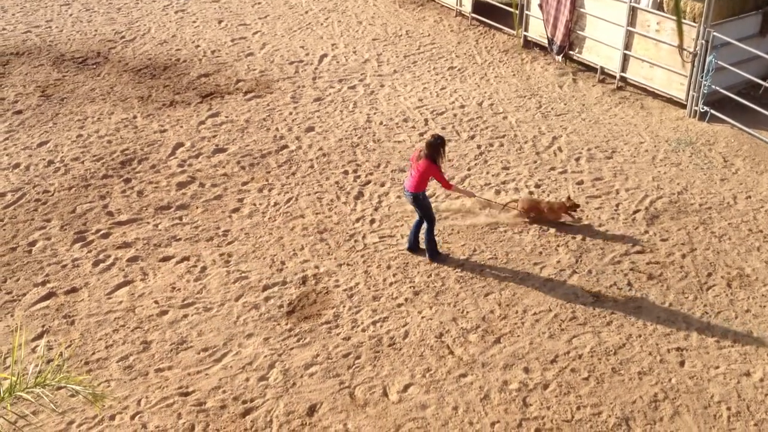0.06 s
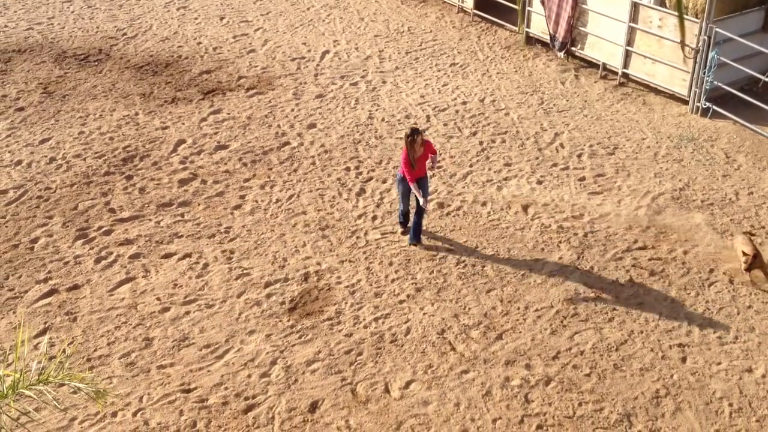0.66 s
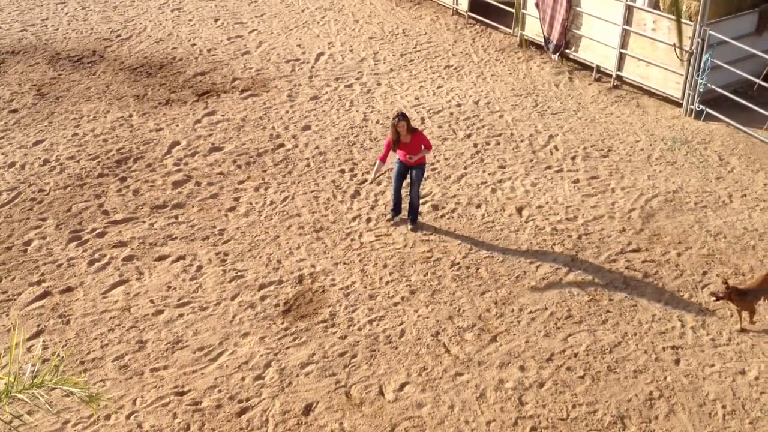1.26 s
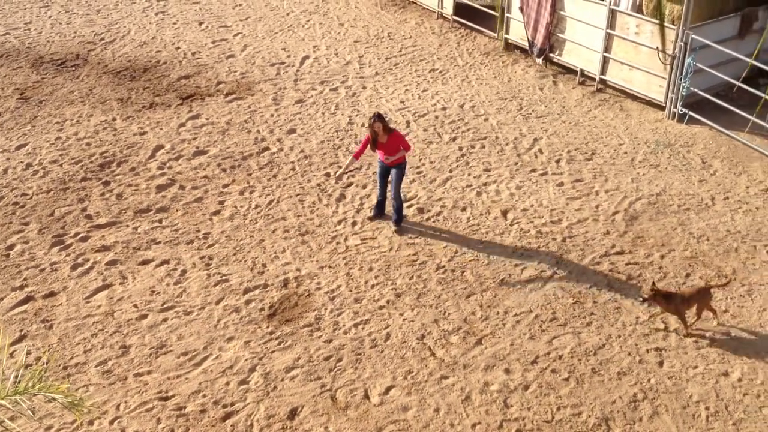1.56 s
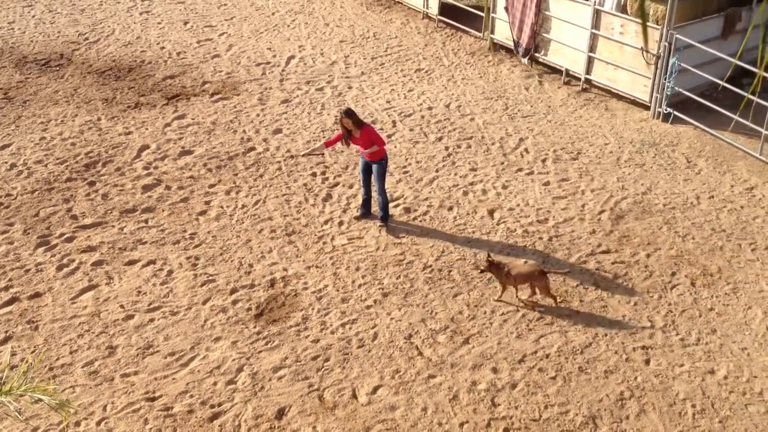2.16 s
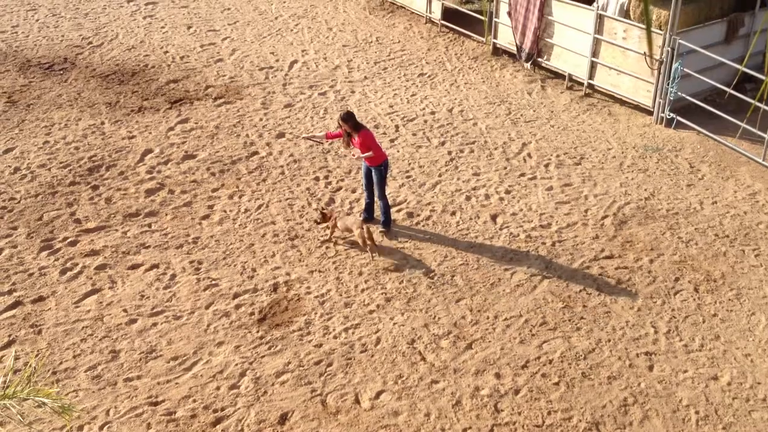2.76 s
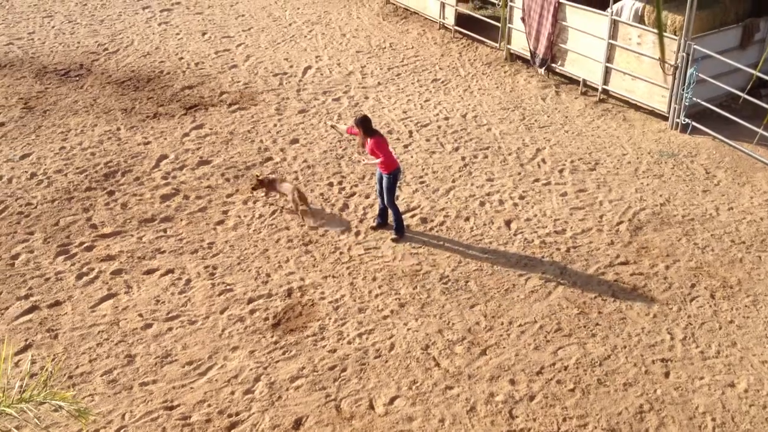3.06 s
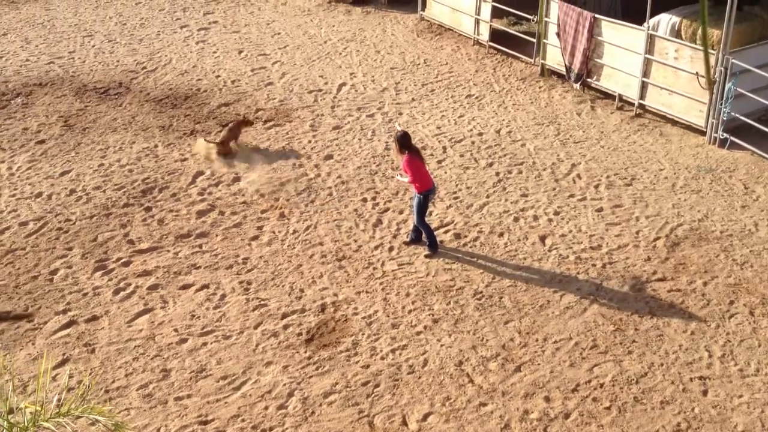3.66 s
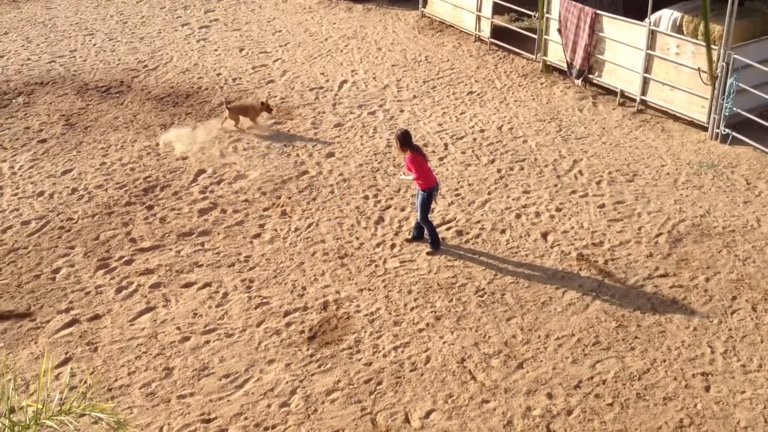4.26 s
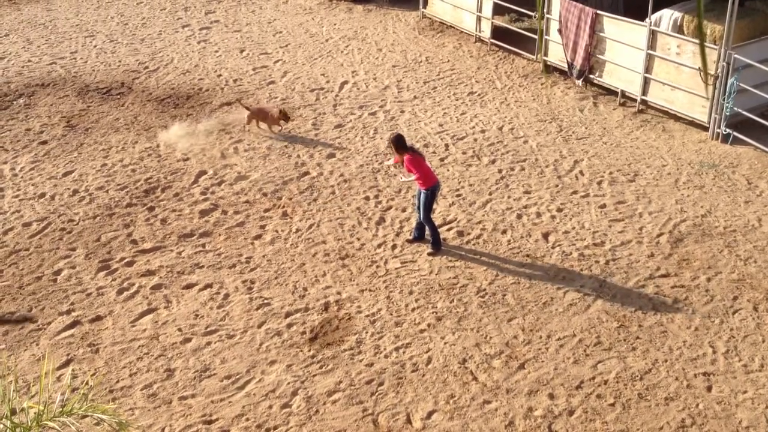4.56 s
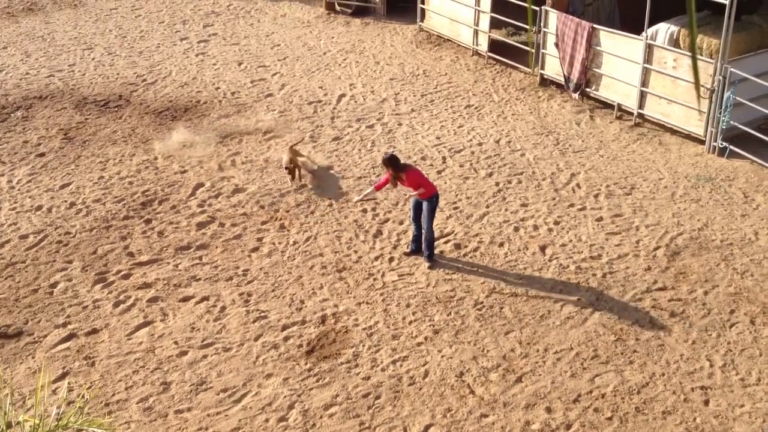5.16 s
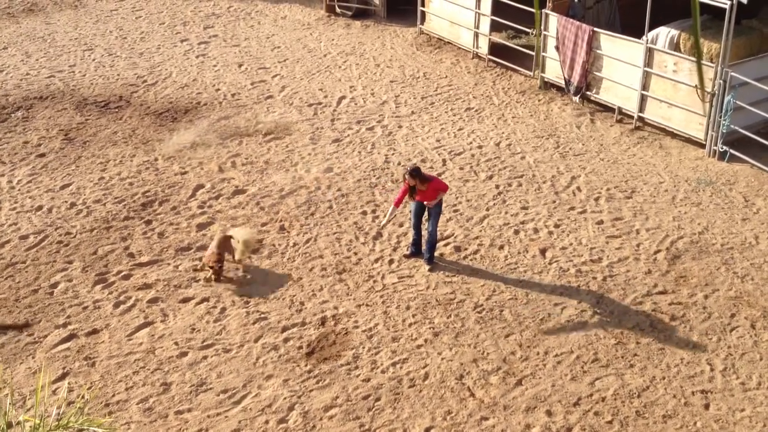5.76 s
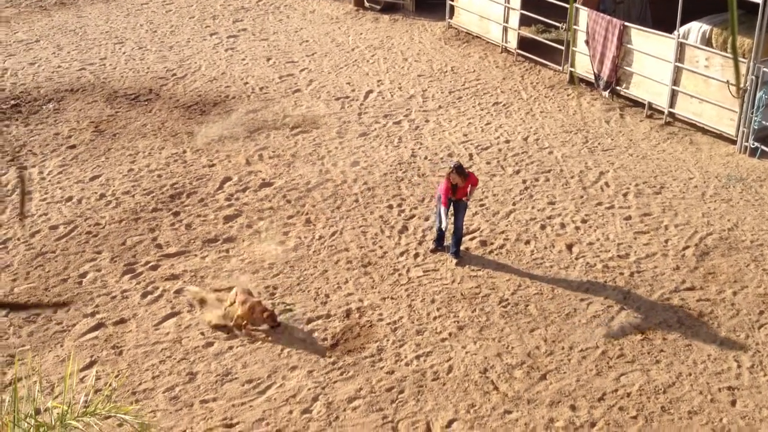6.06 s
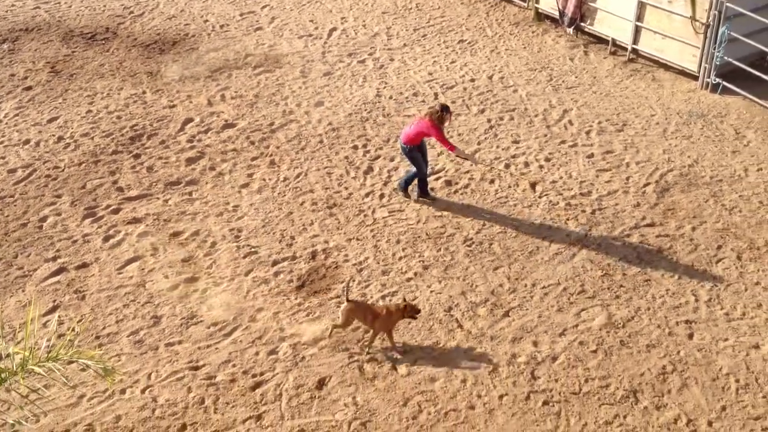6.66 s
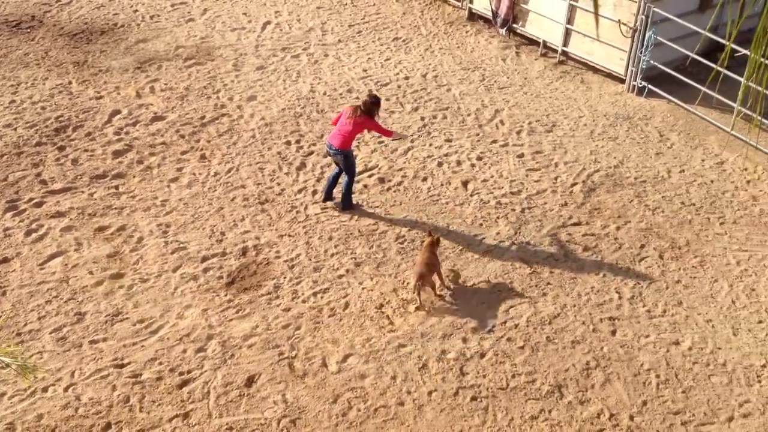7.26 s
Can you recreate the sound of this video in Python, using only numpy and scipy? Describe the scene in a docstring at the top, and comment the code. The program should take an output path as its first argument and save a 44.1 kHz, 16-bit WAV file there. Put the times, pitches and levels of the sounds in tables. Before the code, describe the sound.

Fingers shift on a hand-held camera outdoors, making dry pops, soft thuds and short rubs right at the microphone. Two very faint, distant whip swishes come first, then a sharp pop, a soft whoosh and faint hums. The loudest pop falls past the middle, after which the rubbing and bumping grow busier. A sleeve slides and plastic ticks sharply at the end. Low rumble and hiss continue underneath.

```python
"""Handling noise on a hand-held camera, high above a sandy arena where a dog chases a lure on a whip.
Fingers slip, push and drag on the case: it pops, thuds and rubs right at the microphone.
Near the end a sleeve slides along it and the plastic ticks sharply. Behind lie outdoor rumble and hiss,
two far swishes from eddies shed by the whip, one soft whoosh and faint hums."""
import sys
import numpy as np
from scipy import signal
from scipy.fft import rfft, irfft, next_fast_len
from scipy.io import wavfile
from scipy.ndimage import uniform_filter1d

SR = 44100
rng = np.random.default_rng(int(sys.argv[2]) if len(sys.argv) > 2 else 0)


def to_wav(s):
    """Save 16-bit WAV."""
    ch = np.atleast_2d(s).T  # columns
    pcm = np.round(np.clip(ch, -1, 1) * 32767)  # PCM
    wavfile.write(sys.argv[1], SR, pcm.astype(np.int16))


N = 332073
N_FFT = next_fast_len(N)
T = np.arange(N) / SR


def amp(db):
    return 10 ** (np.asarray(db) / 20)


def unit_rms(x):
    return x / np.sqrt(np.mean(x ** 2) + 1e-20)


def bins_hz(size):
    return np.fft.rfftfreq(size, 1 / SR)


def db_at(spectrum, hz):
    """Spectrum level, interpolated over log frequency."""
    knots_hz, db = np.transpose(spectrum)
    return np.interp(np.log(hz + 1), np.log(knots_hz + 1), db)


def coloured(x, spectrum):
    return irfft(rfft(x) * amp(db_at(spectrum, bins_hz(len(x)))), len(x))


def noise(spectrum):
    return unit_rms(coloured(rng.standard_normal(N_FFT), spectrum)[:N])


def band_noise(hz, half_width_hz):
    gain = 1 / (1 + ((bins_hz(N_FFT) - hz) / half_width_hz) ** 4)
    return unit_rms(irfft(rfft(rng.standard_normal(N_FFT)) * gain, N_FFT)[:N])


def split(x, hz):
    """Parts of x below and above hz."""
    low = irfft(rfft(x, N_FFT) / (1 + (bins_hz(N_FFT) / hz) ** 4), N_FFT)[:N]
    return low, x - low


def pulse(db):
    """Minimum-phase pulse of peak 1 from a level per bin."""
    log_gain = np.log(amp(np.concatenate([db, db[-2:0:-1]])))
    response = np.exp(np.conj(signal.hilbert(log_gain)))
    wave = np.fft.ifft(response).real[:len(response) // 2]
    return wave / abs(wave).max()


def add(mix, time_s, sound):
    part = mix[round(time_s * SR):][:len(sound)]
    part += sound[:len(part)]


def gaussian(centre_s, half_s):
    return np.exp(-np.minimum(((T - centre_s) / half_s) ** 2, 60))


def onset(start_s, rise_s):
    """Time since the start and a 0-to-1 ramp."""
    age_s = np.maximum(T - start_s, 0)
    return age_s, np.minimum(age_s / rise_s, 1)


def stroke(peak_s, length_s, rise_share=0.36):
    """Finger pressure: builds until peak_s, releases more slowly."""
    distance = np.maximum((peak_s - T) / rise_share, (T - peak_s) / (1 - rise_share)) / length_s
    pressure, near = np.zeros(N), distance < 10
    pressure[near] = np.exp(-distance[near] ** 1.4)  # 1 = pointed, 2 = rounded
    return pressure


def background(hiss_db=-72.5):
    """Far outdoor rumble under an even hiss."""
    # rumble level (time [s], level [dB])
    rumble_levels = [(0, -55.5), (.7, -59), (1.3, -56), (3.2, -54), (4.7, -58.5), (6.4, -56), (7.53, -53)]
    # rumble and hiss spectra (frequency [Hz], level [dB])
    rumble_spectrum = [(20, -32.5), (45, -33.5), (80, -17.5), (120, -4), (210, -1), (330, -6), (550, -15.5),
                       (850, -20), (1400, -32), (3000, -46), (16000, -72.5)]
    hiss_spectrum = [(20, -2), (2000, -1), (5000, -3), (8000, -5.5), (12000, -7), (16000, -5)]
    rumble_db = np.interp(T, *np.transpose(rumble_levels))
    return amp(rumble_db) * noise(rumble_spectrum) + amp(hiss_db) * noise(hiss_spectrum)


def rubs(slips_per_s=1500, spread_db=1.5, split_hz=520):
    """Dense, tiny, uneven skin slips shake the case; a faster drag is brighter."""
    # finger strokes (firmest moment [s], length [s], level [dB], brightness [dB])
    strokes = [(.090, 0.026, -47.5, 5), (.182, 0.021, -41, 2.5), (1.312, 0.084, -42, -3.5),
               (1.447, 0.027, -40, -2.5), (1.498, 0.033, -32.5, -0.5), (1.936, .02, -48, -14),
               (2.53, 0.026, -47, -12), (2.578, 0.029, -44.5, -23), (2.889, 0.038, -41.5, -3),
               (2.986, 0.032, -40, -0.5), (3.101, 0.021, -32, -0.5), (3.259, 0.024, -38.5, -7.5),
               (3.361, 0.023, -34.5, 1), (3.429, 0.021, -39, 7), (4.926, 0.018, -26.5, 5.5),
               (4.975, 0.029, -37.5, 4), (5.057, .028, -49.5, 0), (5.738, .03, -47, 2),
               (5.819, 0.035, -35.5, -.5), (5.952, 0.067, -39.5, 5.5), (6.002, 0.026, -26.5, -1),
               (6.068, .028, -46.5, -2.5), (6.258, 0.026, -26, 0.5), (6.352, 0.028, -46, 2.5),
               (6.549, 0.034, -43, -2.5), (6.634, 0.035, -30, 1), (6.726, 0.04, -36, 2.5),
               (6.791, 0.019, -42, -8), (6.854, .032, -26.5, 1), (6.912, 0.037, -26, -1),
               (6.944, 0.015, -29, 0), (7.013, 0.045, -25.5, 1), (7.059, 0.04, -35, -4),
               (7.138, 0.03, -34.5, 0.5), (7.16, .03, -49, 23.5)]
    # skin on the case (frequency [Hz], level [dB])
    skin_spectrum = [(20, -47), (60, -22.5), (110, -6.5), (185, 1.5), (290, -6), (450, -11.5), (600, -19),
                     (760, -20.5), (950, -24.5), (1400, -30), (2000, -36.5), (4500, -49), (8000, -61.5),
                     (16000, -68.5)]
    slipping = rng.random(N) < slips_per_s / SR
    sizes = amp(spread_db * np.minimum(rng.exponential(1, N), 3))
    slips = unit_rms(slipping * sizes * rng.choice([-1, 1], N))
    friction = slips + 0.56 * rng.standard_normal(N)
    shake = coloured(np.pad(friction, (0, N_FFT - N)), skin_spectrum)[:N]
    shake /= np.sqrt(uniform_filter1d(shake ** 2, size=900) + 1e-12)  # steady grip force
    body, scrape = split(shake, split_hz)
    body_power, scrape_power = np.zeros(N), np.zeros(N)
    for peak_s, length_s, db, bright_db in strokes:
        power = (amp(db) * stroke(peak_s, length_s)) ** 2
        body_power += power
        scrape_power += power * amp(bright_db) ** 2
    return body * np.sqrt(body_power) + scrape * np.sqrt(scrape_power)


def swishes():
    """Eddies shed by the far whip sing in a broad band."""
    # whip swings (centre [s], half length [s], level [dB], pitch [Hz])
    swings = [(0.327, 0.025, -64, 1390), (0.614, 0.036, -66, 1210)]
    return sum(amp(db) * gaussian(centre_s, half_s) * band_noise(hz, half_width_hz=450)
               for centre_s, half_s, db, hz in swings)


def pops():
    """A sudden slip steps the port pressure; the case swings briefly, faster in a tight grip."""
    # finger slips (time [s], peak [dB], low-pass corner [Hz], grip [pitch ratio])
    slips = [(1.3305, -9.5, 1810, 1.06), (1.3502, -31, 228, 0.88), (1.4118, -28, 295, 0.9),
             (2.896, -31.5, 300, 0.94), (3.0902, -34.5, 1800, 1.3), (3.1047, -26, 1750, 1.0),
             (3.4195, -33, 2500, 1.4), (3.4446, -16, 5340, 1.3), (4.9228, -24.5, 5000, 1.9),
             (4.9319, -2.5, 5600, 1.05), (5.1199, -30, 6740, 1.2), (5.1452, -35.5, 7000, 0.99),
             (5.7283, -31, 2500, 1.2), (5.8464, -24.5, 375, 0.99), (5.9724, -25, 1490, 0.99),
             (6.0005, -24.5, 1200, 0.94), (6.2485, -27.5, 8000, 1.1), (6.3200, -26, 5670, 1.35),
             (6.3276, -31, 7000, 1.1), (6.6318, -23, 5950, 1.47), (7.149, -27, 1530, 1.9)]
    # case response (frequency [Hz], level [dB])
    case_spectrum = [(20, -53), (50, -31.5), (85, -14), (125, -2.5), (190, 2.5), (280, -1.5), (500, -6.5),
                     (1000, -15), (2000, -21), (4000, -27), (8000, -31.5), (16000, -26)]
    out, hz = np.zeros(N), bins_hz(4096)
    for time_s, peak_db, corner_hz, grip in slips:
        rolloff_db = -10 * np.log10(1 + (hz / corner_hz) ** 3.75)
        add(out, time_s, amp(peak_db) * pulse(db_at(case_spectrum, hz / grip) + rolloff_db))
    return out


def thuds(half_s=0.0052):
    """A soft push rocks the case for a few cycles, with no click."""
    # hand pushes (centre [s], peak [dB], pitch [Hz])
    pushes = [(1.520, -32.5, 146), (3.1097, -28, 153), (4.929, -13, 262), (4.9349, -13, 191),
              (6.2634, -22, 146), (6.8586, -12.5, 186), (6.912, -24, 195), (7.0133, -19, 206),
              (7.0295, -16.5, 176)]
    return sum(amp(db) * gaussian(centre_s, half_s) * np.cos(2 * np.pi * hz * (T - centre_s))
               for centre_s, db, hz in pushes)


def whoosh(db=-50, hold_s=0.28, fade_db_per_s=31, bright_db=12.5, dull_db_per_s=34):
    """A soft rush rises, holds and dies; its treble fades faster than its body."""
    # rushing air (frequency [Hz], level [dB])
    air_spectrum = [(30, -36), (90, -20), (200, 2), (350, 4.5), (500, -4.5), (750, -3), (1100, -9.5),
                    (2000, -24), (4000, -38), (8000, -49), (16000, -61)]
    age_s, ramp = onset(start_s=1.519, rise_s=0.029)
    envelope = ramp * amp(db - fade_db_per_s * np.maximum(age_s - hold_s, 0))
    body, treble = split(noise(air_spectrum), hz=1500)
    return envelope * (body + treble * amp(bright_db - dull_db_per_s * age_s))


def hums(waver=0.0059):
    """Faint tones come and go, gliding and wavering slightly."""
    # far tones (centre [s], half length [s], level [dB], pitch [Hz], glide [Hz/s])
    tones = [(1.7, 0.16, -50.5, 337, 0.5), (1.88, .24, -54, 381, -3.5), (4.12, 0.65, -57.5, 207, 8.5),
             (4.0, 0.21, -61.5, 334, -8)]
    out = np.zeros(N)
    for centre_s, half_s, db, hz, glide_hz_per_s in tones:
        drift = unit_rms(uniform_filter1d(rng.standard_normal(N), size=2500))
        pitch_hz = hz * (1 + waver * drift) + glide_hz_per_s * (T - centre_s)
        phase = 2 * np.pi * np.cumsum(pitch_hz) / SR
        out += amp(db) * gaussian(centre_s, half_s) * np.sqrt(2) * np.sin(phase)
    return out


def sleeve(db=-53, swell_db_per_s=9.5):
    """A sleeve slides along the case, slowly growing louder."""
    # cloth friction (frequency [Hz], level [dB])
    cloth_spectrum = [(30, -60), (100, -30), (210, 5.5), (350, -1), (520, -6.5), (900, -7), (1500, -11.5),
                      (2500, -21.5), (4000, -26), (6500, -23.5), (8200, -29), (10000, -39), (16000, -41)]
    age_s, ramp = onset(start_s=7.154, rise_s=0.05)
    return ramp * amp(db + swell_db_per_s * age_s) * noise(cloth_spectrum)


def ticks():
    """Hard plastic ticks dryly, with almost no bass."""
    # ticks (time [s], peak [dB])
    hits = [(7.1686, -34.5), (7.2990, -19), (7.3105, -11.5), (7.4888, -36)]
    # plastic response (frequency [Hz], level [dB])
    tick_spectrum = [(100, -32), (600, -9), (1500, -7.5), (3000, -1), (5500, 4), (7500, 0), (11000, -8.5),
                     (16000, -16)]
    out, tick = np.zeros(N), pulse(db_at(tick_spectrum, bins_hz(4096)))
    for time_s, peak_db in hits:
        add(out, time_s, amp(peak_db) * tick)
    return out


def scene():
    """Dry, close handling over faint, far sounds; mono."""
    handling = pops() + thuds() + rubs() + ticks() + sleeve()
    return (handling + swishes() + whoosh() + hums() + background())[None]


def record(dry):
    """The microphone port notches the treble; a low-pass limits the band."""
    # microphone response (frequency [Hz], gain [dB])
    mic_response = [(20, 0.5), (6500, 0), (8200, -2), (9700, -7.5), (11000, -2.5), (12500, 2), (14300, 3),
                    (16000, -0.5)]
    cutoff_hz = 15600
    padded = np.pad(dry[0], (0, next_fast_len(N + SR) - N))
    heard = coloured(padded, mic_response)[:N]
    lowpass = signal.firwin(301, cutoff_hz, window=("kaiser", 8), fs=SR)
    return signal.oaconvolve(heard, lowpass, "same")[None]


dry = scene()
out = record(dry)
to_wav(out)
```